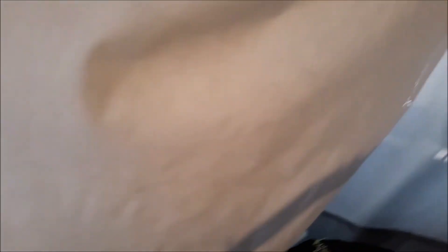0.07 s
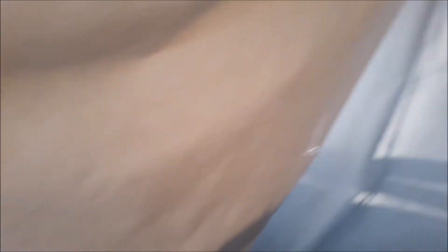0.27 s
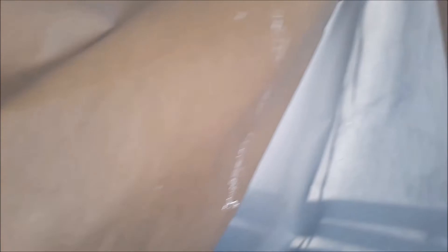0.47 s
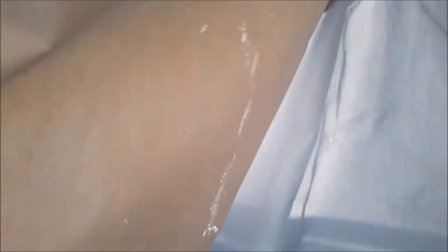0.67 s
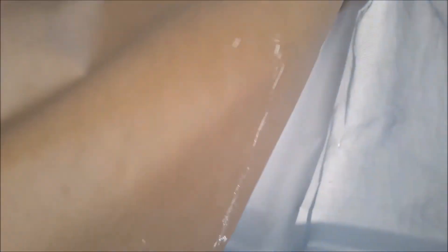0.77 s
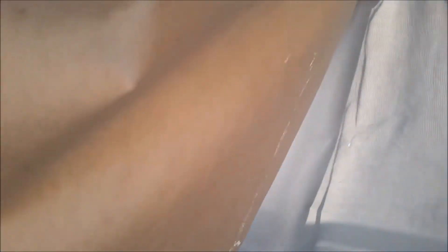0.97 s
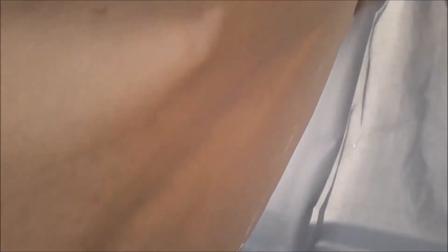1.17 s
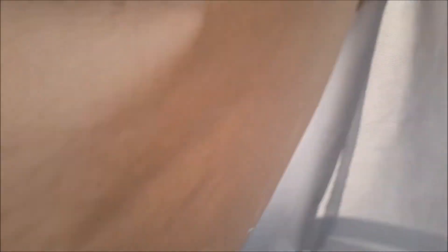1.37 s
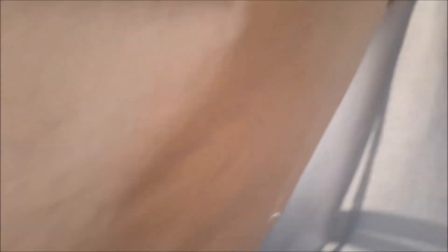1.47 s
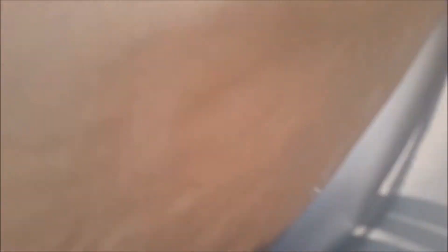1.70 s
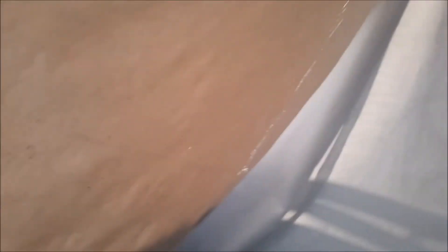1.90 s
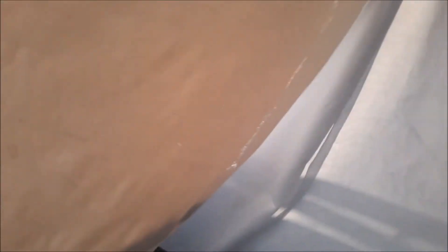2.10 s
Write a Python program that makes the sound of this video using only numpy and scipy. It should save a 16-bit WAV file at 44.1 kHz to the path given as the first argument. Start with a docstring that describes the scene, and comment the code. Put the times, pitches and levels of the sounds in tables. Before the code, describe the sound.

Canvas flapping in gusty wind, heard close from inside a camper, rustling, ticking and snapping harder

```python
"""A soft flutter over a faint low rumble opens the scene: strong wind on a camper's canvas wall,
heard from inside. Both are shaped noise and swell unevenly; sliding folds swish in dense random slips,
creases crinkle as ringing pops, and brief scrapes and a tiny squeak ring as filtered noise.
Tight panels twang as gliding tones; slack panels thump and cloth pulled taut snaps,
each a pressure pulse with a shudder. Twangs, thumps and snaps also get short cabin reflections."""
import sys
import numpy as np
from scipy import signal
from scipy.fft import rfft, irfft
from scipy.io import wavfile
from scipy.ndimage import uniform_filter1d

SR = 44100
rng = np.random.default_rng(int(sys.argv[2]) if len(sys.argv) > 2 else 0)


def materialize(psi):
    """Save the field psi as 16-bit PCM at rate SR to the path in sys.argv[1].

    A 1-D psi becomes a single channel; in a 2-D psi each row is a channel.
    """
    bounded = np.clip(np.atleast_2d(psi).T, -1, 1)
    quanta = np.round(bounded * 32767).astype(np.int16)
    wavfile.write(sys.argv[1], SR, quanta)


N = 94726
TIME = np.arange(N) / SR


def amp(db):
    """Decibels to gain."""
    return 10 ** (np.asarray(db) / 20)


def unit(x):
    """Scales to rms 1."""
    return x / np.sqrt(np.mean(x ** 2) + 1e-20)


def level(points):
    """Gain over time, in straight dB lines between (time [s], level [dB]) points."""
    return amp(np.interp(TIME, *np.transpose(points)))


def read(points, hz):
    """Reads (frequency [Hz], value) points on a log frequency axis."""
    f, value = np.transpose(points)
    return np.interp(np.log(hz + 1), np.log(f + 1), value)


def add(mix, start_s, sound):
    """Mixes a stereo sound in at a time, cut off at the end of the scene."""
    part = mix[:, round(start_s * SR):][:, :sound.shape[1]]
    part += sound[:, :part.shape[1]]


def waver(rate_hz):
    """Random movement below about rate_hz, rms 1."""
    hz = np.fft.rfftfreq(N, 1 / SR)
    return unit(irfft(rfft(rng.standard_normal(N)) / (1 + (hz / rate_hz) ** 4), N))


def grains(per_s, spread_db):
    """Two unrelated trains of random clicks of either sign and uneven size, rms 1."""
    size = amp(spread_db * np.minimum(rng.exponential(1, (2, N)), 4))
    sign = rng.choice([-1, 1], (2, N))
    return unit(size * sign * (rng.random((2, N)) < per_s / SR))


# Stereo likeness of the cloth: (frequency [Hz], left-right correlation [-1 to 1])
EAR_LIKENESS = [(30, 0.29), (100, 0.9), (300, 0.87), (600, 0.48), (1100, -0.23), (15000, 0.054)]


def blend(z, hz):
    """Cross-mixes two unrelated spectra to a set left-right correlation at each frequency."""
    angle = np.arcsin(np.clip(read(EAR_LIKENESS, hz), -1, 1)) / 2
    return np.cos(angle) * z + np.sin(angle) * z[::-1]


def colour(pair, spectrum, balance=None):
    """Gives two unrelated signals a spectrum, stereo likeness and optional balance, rms 1."""
    hz = np.fft.rfftfreq(N, 1 / SR)
    z = blend(rfft(pair), hz) * amp(read(spectrum, hz))
    if balance:
        z = z * amp(np.outer([.5, -.5], read(balance, hz)))
    return unit(irfft(z, N))


# Wind pressure on the wall: (time [s], rumble level before its waver [dB])
WIND_PRESSURE = [(0, -56), (.3, -59), (.5, -54), (.72, -45), (.88, -41), (1.02, -40.5), (1.09, -32.5),
                 (1.16, -37.5), (1.24, -34), (1.33, -43), (1.43, -41), (1.6, -42), (1.77, -38.5),
                 (1.85, -36), (1.94, -41), (2.05, -40.5), (2.14, -37.5)]
# Tone of the heaving wall: (frequency [Hz], relative level [dB])
RUMBLE_SPECTRUM = [(12, -23), (28, -24), (50, -11.5), (75, -2.5), (115, -2), (170, -2.5), (260, -9.5),
                   (450, -29), (1200, -82)]


def rumble():
    """The whole wall heaves under the wind: low noise with an unsteady level."""
    heave = colour(rng.standard_normal((2, N)), RUMBLE_SPECTRUM)
    return level(WIND_PRESSURE) * heave * amp(1.3 * waver(rate_hz=7.6))


# Strength of the small flutter: (time [s], level before its waver [dB])
FLUTTER_LEVEL = [(0, -50), (.2, -48), (.29, -51.5), (.38, -43.5), (.48, -46), (.56, -42), (.63, -50.5),
                 (.82, -44), (.92, -38), (1.02, -41.5), (1.09, -34.5), (1.15, -41), (1.21, -34.5),
                 (1.3, -40.5), (1.43, -43.5), (1.54, -38), (1.76, -38), (1.94, -41), (2.02, -34),
                 (2.14, -31.5)]
# Tone of the soft flaps: (frequency [Hz], relative level [dB])
FLUTTER_SPECTRUM = [(40, -40), (130, -19), (210, 2.5), (310, 4.5), (390, -3), (490, -0.5), (700, -8),
                    (1100, -11.5), (1600, -16), (2300, -17.5), (3500, -23), (7000, -27.5), (15000, -80)]


def flutter():
    """Many small soft flaps run over the cloth: dense random taps with some noise between."""
    taps = grains(per_s=900, spread_db=2)
    flaps = colour(taps + 0.28 * rng.standard_normal((2, N)), FLUTTER_SPECTRUM)
    return level(FLUTTER_LEVEL) * flaps * amp(1.5 * waver(rate_hz=21))


# Effort of the sliding folds: (time [s], level before the rub's waver [dB])
SWISH_LEVEL = [(0, -58.5), (.3, -52.5), (.42, -45.5), (.48, -52.5), (.61, -49.5), (.68, -45.5),
               (.76, -48.5), (.85, -46), (.91, -51.5), (.97, -46.5), (1.04, -56.5), (1.08, -41),
               (1.11, -43.5), (1.135, -48.5), (1.2, -51), (1.28, -45.5), (1.33, -50.5), (1.44, -49),
               (1.5, -43), (1.65, -40), (1.73, -42), (1.765, -51.5), (1.86, -48), (1.97, -54.5),
               (2.03, -44.5), (2.14, -51.5)]
# Tone of the rubbing weave: (frequency [Hz], relative level [dB])
SWISH_SPECTRUM = [(100, -30), (600, 1.5), (1300, -10.5), (2100, -0.5), (3000, -4.5), (3900, 0),
                  (5000, -6.5), (6200, 1), (6900, -2), (7800, -12), (10300, -10), (15500, -12.5)]
# Stereo place of the rubbing: (frequency [Hz], left minus right [dB])
RUB_BALANCE = [(1000, -12.5), (2400, -7.5), (4400, 4), (8000, -0.5), (15000, -0.5)]
# Bright hiss added by hard rubbing: (frequency [Hz], relative level [dB])
HISS_SPECTRUM = [(1000, -54), (2300, 1), (5300, 1), (6300, 11), (7000, 8.5), (7700, -1), (10300, -2),
                 (11500, -0.5), (15500, -4)]
# Swish level where hiss and rub are set equal [dB]; growth of the hiss [dB per dB of swish]
HISS_FROM_DB, HISS_GROWTH = -41.5, 2.09


def swish():
    """The weave scrapes in dense tiny slips as folds slide; the harder the rub, the brighter the hiss."""
    slips = grains(per_s=7900, spread_db=9.5) + 1.36 * rng.standard_normal((2, N))
    effort = level(SWISH_LEVEL)
    rub = effort * amp(1.2 * waver(rate_hz=55))
    hiss = amp(HISS_FROM_DB) * (effort / amp(HISS_FROM_DB)) ** HISS_GROWTH
    weave = rub * colour(slips, SWISH_SPECTRUM, RUB_BALANCE)
    return weave + hiss * colour(rng.standard_normal((2, N)), HISS_SPECTRUM, RUB_BALANCE)


# Lowest and highest ring [Hz] of the small creases, then of the loose wrinkles
CRINKLE_HZ = 1203, 5400
PUCKER_HZ = 593, 2394


def crinkle(effort, range_hz, db, cycles=5, count=14):
    """Creases pop at random, each ringing for a few cycles; the level follows the cloth's effort."""
    t, out = np.arange(600) / SR, np.zeros((2, N))
    for hz in np.geomspace(*range_hz, count):
        pop = unit(np.sin(2 * np.pi * hz * t) * np.exp(-t * hz / cycles))
        pops = grains(per_s=14, spread_db=2)
        out += signal.oaconvolve(pops, pop[None], axes=1)[:, :N]
    return amp(db) * level(effort) * unit(out)


# A fold scrapes along its neighbour:
# (start [s], length [s], level before the stroke's swell and waver [dB], bright hiss re ringing [dB])
SCRAPE_STROKES = [(0.293, 0.074, -50.5, -1), (0.352, 0.13, -46, -6), (1.468, 0.013, -45.5, 5),
                  (1.845, 0.033, -42.5, -20), (1.926, 0.0091, -50.5, 2.5)]
# Resonances of the stiff weave: (frequency [Hz], width [Hz], relative level [dB])
WEAVE_RINGS = [(1957, 620, 6), (4000, 1200, -2)]


def scrapes():
    """Short strokes of uneven stick and slip that ring in the stiff weave."""
    hz, out = np.fft.rfftfreq(N, 1 / SR), np.zeros((2, N))
    rings = sum(amp(db) / (1 + 2j * (hz - f) / width) ** 2 for f, width, db in WEAVE_RINGS)
    slips = grains(per_s=1500, spread_db=4) * amp(2.5 * waver(rate_hz=90))
    body = unit(irfft(rfft(slips) * rings, N))
    for start_s, length_s, db, hiss_db in SCRAPE_STROKES:
        stroke = np.sin(np.pi * np.clip((TIME - start_s) / length_s, 0, 1))
        out += amp(db) * stroke * (body + amp(hiss_db) * slips)
    return out


def squeak(at_s=2.033, hz=13200, length_s=0.0072, width_hz=200, db=-45):
    """One tiny, thin squeak of the cloth: narrow-band noise under a bell-shaped swell."""
    f = np.fft.rfftfreq(N, 1 / SR)
    band = 1 / (1 + (2 * (f - hz) / width_hz) ** 2)
    ring = unit(irfft(rfft(rng.standard_normal((2, N))) * band, N))
    return amp(db) * ring * np.exp(-((TIME - at_s) / length_s) ** 2)


# A tight panel rings briefly:
# (time [s], level before the envelope [dB], starting pitch [Hz], decay [s], starting glide [octaves/s])
PANEL_TWANGS = [(.191, -30, 322.5, 0.014, -2), (1.1835, -13, 484, 0.0056, -3.5),
                (1.206, -25, 275, 0.015, -7), (1.889, -22.5, 510, 0.0067, -4),
                (2.004, -30.5, 710, 0.024, -7), (2.0885, -12, 862, 0.0035, -7),
                (2.094, -18.5, 479, 0.011, 9)]


def twangs(rise_cycles=0.5, lag_s=0.00028, size=8192):
    """A stretched panel's note slides as the tension changes; the right ear hears it later."""
    t = np.maximum(np.arange(size) / SR - np.array([[0], [lag_s]]), 0)
    out = np.zeros((2, N))
    for start_s, db, hz, decay_s, glide in PANEL_TWANGS:
        envelope = (1 - np.exp(-(t * hz / rise_cycles) ** 2)) * np.exp(-t / decay_s)
        cycles = hz * t * 2 ** (glide * t / 2)
        add(out, start_s, amp(db) * envelope * np.sin(2 * np.pi * (cycles + rng.random())))
    return out


LEAD_CYCLES = 1  # build-up time of the shiver before the pulse [pulse lengths]


def flap(shape_of, pulse_s, decay_s, shudder_db, lag_ms, size=8192):
    """A pressure pulse in mid-buffer; the panel shivers just before it and shudders after."""
    f, t = np.fft.rfftfreq(size, 1 / SR), (np.arange(size) - size // 2) / SR
    shape = shape_of(f)
    # a positive lag brings the pulse later to the right ear
    delay_s = -t[0] + np.array([[-.5], [.5]]) * lag_ms * 1e-3
    pulse = shape * np.exp(-2j * np.pi * f * delay_s)
    envelope = np.exp(-abs(t) / np.where(t > 0, decay_s, LEAD_CYCLES * pulse_s))
    envelope *= 1 - np.exp(-(t / pulse_s) ** 2)  # leaves room for the pulse itself
    ragged = amp(3.5 * unit(uniform_filter1d(rng.standard_normal(size), size=50)))
    shudder = blend(rfft(rng.standard_normal((2, size)) * envelope * ragged), f) * shape
    shudder *= amp(shudder_db) * np.linalg.norm(pulse) / np.linalg.norm(shudder)
    turn = np.exp(2j * np.pi * rng.random())  # a random phase varies the waveform
    return irfft((pulse + shudder) * turn) / irfft(shape).max()


# Slack panel fills: (time [s], pulse level before the phase turn [dB], pitch [Hz], shudder re pulse [dB])
PANEL_FILLS = [(0.755, -21, 230, -4), (.914, -27, 298, -2), (1.1119, -27, 202, -16),
               (1.1851, -18.5, 407, -1), (1.2125, -16, 262, -2.5), (1.226, -21, 210, -11),
               (1.256, -25, 130, 0), (1.539, -16, 298, -3), (1.6539, -11.5, 173, -7),
               (1.7468, -19, 336, -1), (1.8135, -19.5, 210, -3), (1.886, -25, 95, -3),
               (1.9728, -15.5, 290, -14), (2.0104, -19.5, 280, -17), (2.096, -20, 277, 5),
               (2.104, -19.5, 98, -5)]


def thumps(low_slope=2.15, high_slope=2.94, fizz_db=-40):
    """Dull pulses as a slack panel fills, each a broad hump around its pitch with faint fizz above."""
    out = np.zeros((2, N))
    for centre_s, db, hz, shudder_db in PANEL_FILLS:
        def shape(f):
            u = f / hz
            hump = u ** low_slope / (1 + u ** (low_slope + high_slope))
            return hump + amp(fizz_db) * u ** 2 / (1 + u ** 3)
        sound = flap(shape, 1 / hz, decay_s=0.0098, shudder_db=shudder_db, lag_ms=.08)
        add(out, centre_s - sound.shape[1] / 2 / SR, amp(db) * sound)
    return out


# Cloth pulled taut: (time [s], pulse level before the phase turn [dB], lower edge [Hz], upper edge [Hz],
# shudder decay [s], shudder re pulse [dB], right-ear delay of the pulse [ms])
TAUT_SNAPS = [(0.4268, -19.5, 1810, 4670, 0.0022, -1, 0.47), (0.5758, -18, 382, 900, 0.0058, -3.5, 0.086),
              (.661, -32, 1500, 6000, 0.0031, 7, 0.15), (0.698, -25, 517, 1290, 0.0039, -1.5, 0.48),
              (1.185, -5, 1480, 6150, 0.0056, 2, 0.41), (1.1855, -20, 5460, 14500, 0.005, 6, 0.47),
              (1.2115, -24.5, 1200, 2400, 0.0073, 4.5, 0.59), (1.2795, -24, 700, 6000, 0.0029, -3, 0.32),
              (1.651, -19, 440, 1080, 0.004, 2, -0.37), (1.6924, -6, 520, 2480, 0.011, -11, -0.14),
              (1.8214, -14.5, 397, 875, 0.012, -5, 0.56), (1.8932, -23, 600, 1480, 0.0039, 2, 0.023),
              (1.9728, -16.5, 960, 2240, 0.0022, 0, -0.05), (1.992, -21.5, 500, 940, 0.004, -2, -0.15),
              (2.0903, -16.5, 850, 1410, 0.0024, 1, 0.52), (2.0909, -17.5, 2020, 2860, 0.0036, 1, 0.28),
              (2.0975, -17, 900, 2700, 0.0033, -7, 0.38), (2.1452, -7, 1080, 3500, 0.0015, -2, 0.33)]
FIZZ_HZ = 397  # upper edge at which the fizz has its set level; a higher edge carries ever more


def snaps(low_slope=1.67, tilt=1.23, edge_slope=9, fizz_db=-50):
    """Sharp ticks as the cloth is jerked taut: pulses peaking near a lower edge, cut at an upper one."""
    out = np.zeros((2, N))
    for centre_s, db, low_hz, top_hz, decay_s, shudder_db, lag_ms in TAUT_SNAPS:
        def shape(f):
            u = f / low_hz
            hump = u ** low_slope / (1 + u ** (low_slope + tilt))
            edge = 1 / (1 + (f / top_hz) ** edge_slope)
            return hump * (edge + amp(fizz_db) * top_hz / FIZZ_HZ)
        sound = flap(shape, 1 / low_hz, decay_s, shudder_db, lag_ms)
        add(out, centre_s - sound.shape[1] / 2 / SR, amp(db) * sound)
    return out


def cabin(x, decay_s, wet_db, size=6000):
    """Short, soft reflections of the small interior: a decaying noise tail after a 3 ms gap."""
    t = np.arange(size) / SR
    tail = rng.standard_normal((2, size)) * np.exp(-t / decay_s) * (t > .003)
    wet = signal.fftconvolve(x, tail / np.linalg.norm(tail[0]), axes=1)[:, :N]
    return x + amp(wet_db) * wet


def scene():
    """All the motions of the canvas together."""
    creases = crinkle(SWISH_LEVEL, CRINKLE_HZ, db=-9.5)
    wrinkles = crinkle(FLUTTER_LEVEL, PUCKER_HZ, db=-11)
    cloth = rumble() + flutter() + swish() + creases + wrinkles + scrapes() + squeak()
    return cloth + cabin(thumps() + snaps() + twangs(), decay_s=.012, wet_db=-12)


def record(dry):
    """Steep low-pass that removes the treble above 15850 Hz."""
    low_pass = signal.firwin(1023, 15850, window=("kaiser", 9), fs=SR)
    return signal.oaconvolve(dry, low_pass[None], "same")


dry = scene()
out = record(dry)
materialize(out)
```